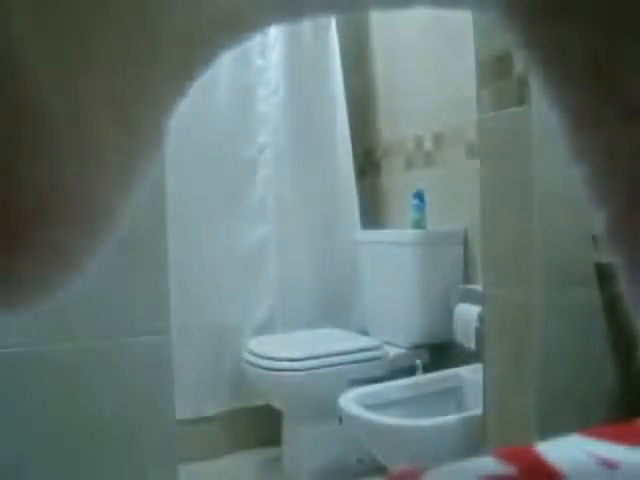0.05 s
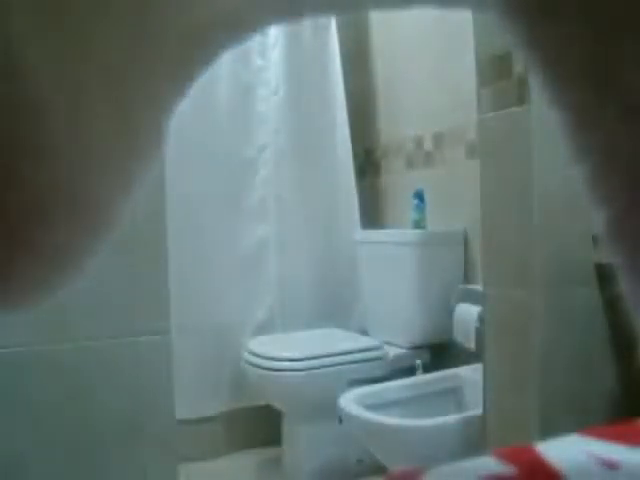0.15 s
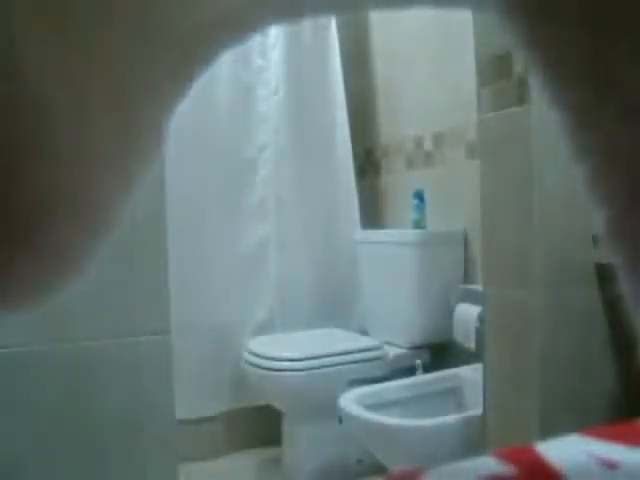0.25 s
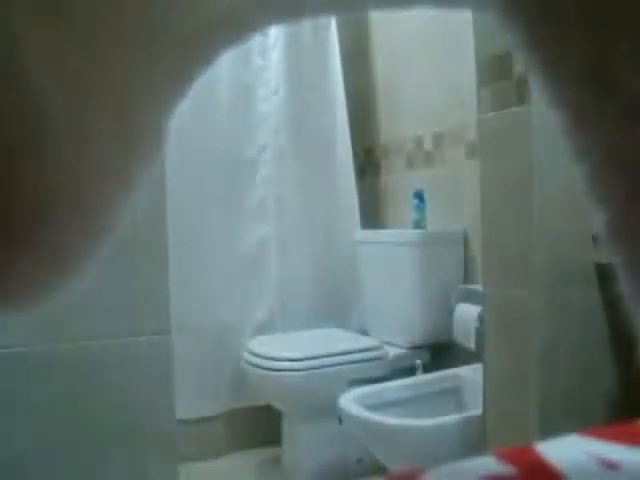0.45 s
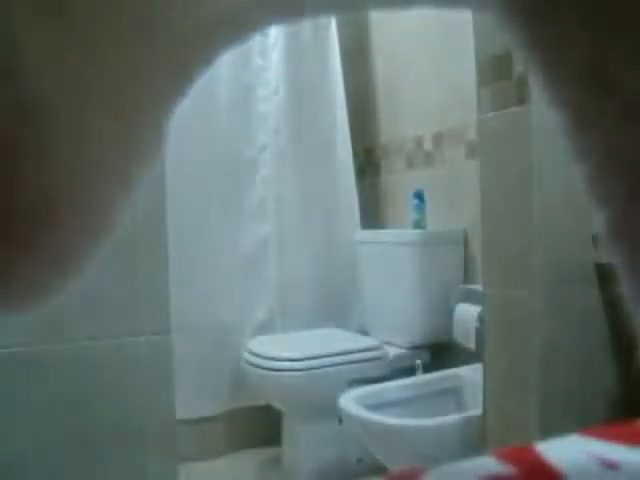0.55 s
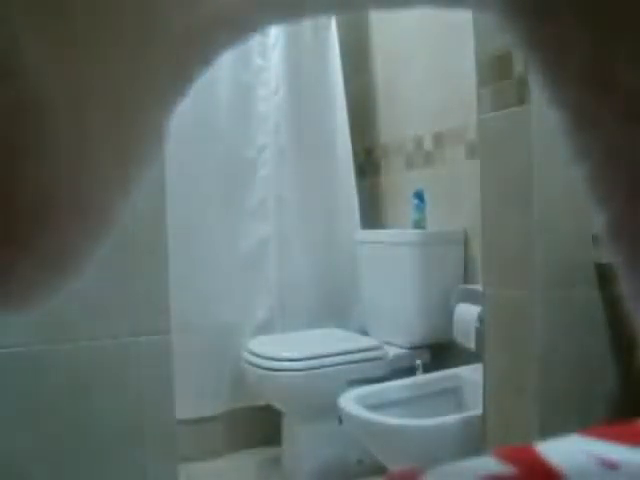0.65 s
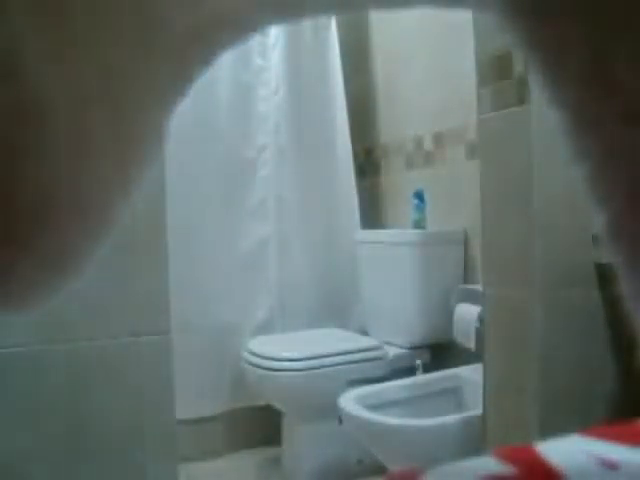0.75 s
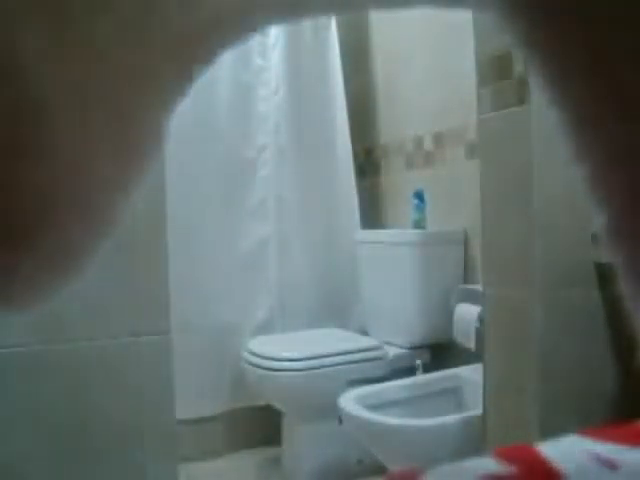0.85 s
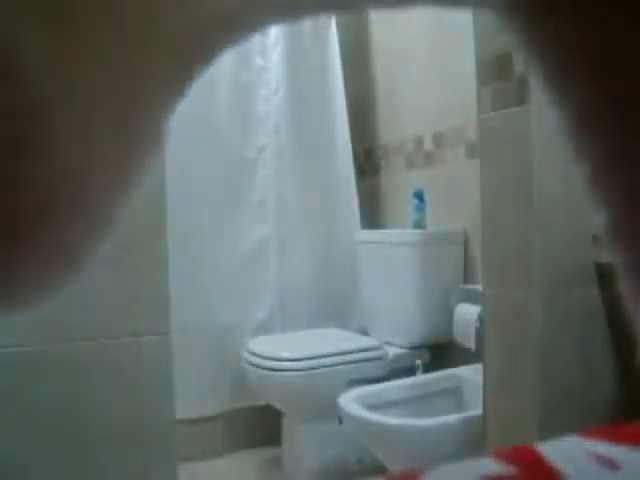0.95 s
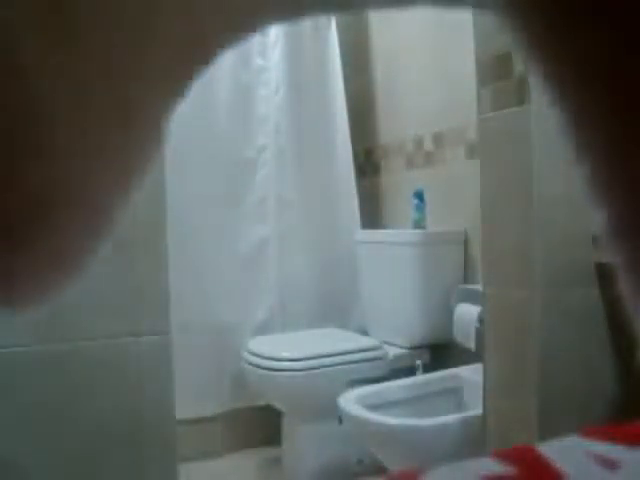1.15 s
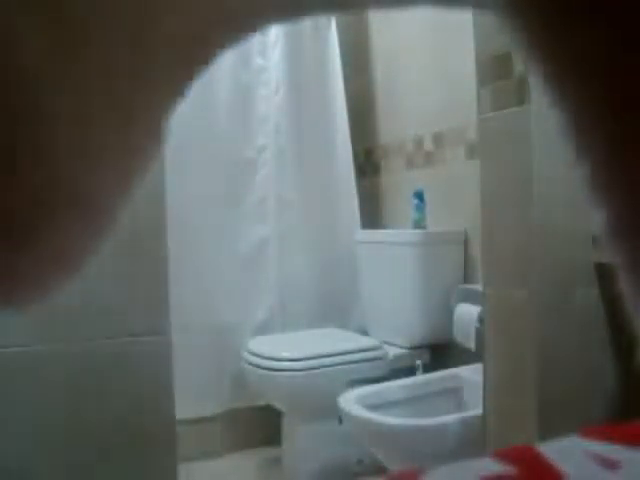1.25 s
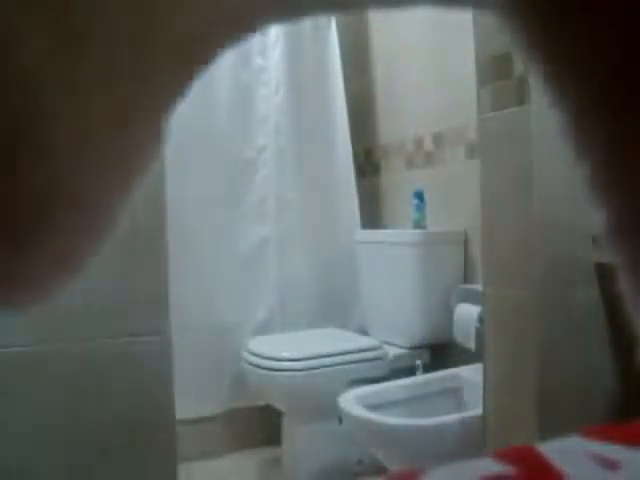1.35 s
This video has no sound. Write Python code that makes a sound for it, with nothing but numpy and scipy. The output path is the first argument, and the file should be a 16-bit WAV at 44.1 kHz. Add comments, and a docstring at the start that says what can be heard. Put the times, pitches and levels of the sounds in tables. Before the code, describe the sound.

A door is pushed shut in a small bathroom, its latch snapping before a booming thud.

```python
"""A door is pushed shut in a small tiled bathroom.
Its handle ticks twice, then the latch scrapes over its plate and snaps. The door pushes
air ahead of it, hits the frame and chatters while the room booms. Faint dull bumps follow
over a steady hiss. Each hit is a burst of fading noise; things that ring add fading tones."""
import sys
import numpy as np
from scipy import signal
from scipy.fft import rfft, irfft, next_fast_len
from scipy.io import wavfile
from scipy.ndimage import uniform_filter1d

SR = 44100
rng = np.random.default_rng(int(sys.argv[2]) if len(sys.argv) > 2 else 0)


def pcm_store(signal):
    """Save signal as 16-bit PCM."""
    levels = np.round(np.clip(np.atleast_2d(signal), -1, 1) * 32767)
    wavfile.write(sys.argv[1], SR, levels.astype(np.int16).T)


N = 61739
TIME = np.arange(N) / SR
BAND_EDGES_HZ = 28 * 2 ** (np.arange(44) / 5)
BAND_CENTRES_HZ = np.sqrt(BAND_EDGES_HZ[1:] * BAND_EDGES_HZ[:-1])

# When each hit happens: (time [s], level [dB], brightness [dB per octave])
RUBS = [(.001, 1.5, 0), (.158, -0.5, -3.5)]
HANDLE_TICKS = [(.039, 0, 0.6), (.127, -.5, 0.8)]
LATCH_SCRAPES = [(.204, 0, 1), (.212, 0.5, -1.8), (.232, -2.5, -0.61), (.256, 4, 0), (.281, 2, -1.4),
                 (.305, 3, -1.85)]
CRACKS = [(.2045, -9.5, 1.5), (.3475, 1, 2), (.3525, -3, 4), (.357, -2, -2)]
LATCH_SNAPS = [(.254, 0, 0.0063)]
SLAMS = [(.347, -2.5, 2.87), (.352, -2, -0.88), (.363, -4, -2), (.379, -7.5, -2.9), (.391, -4.5, -3.1),
         (.42, -13, 0.61), (.44, -21, -2), (.497, -24, -2)]
SOFT_KNOCKS = [(.669, 0.5, 0.12), (.716, -5.5, -0.1), (.885, -10, -1.26), (1.04, -10, 0),
               (1.134, -19, 0.13), (1.37, -16, -0.15)]
BUMPS = [(.781, -1, 1.2), (.821, 1.5, 0.62), (.85, -10.5, -1.7)]
SMALL_TICKS = [(.781, 4.5, -2.6), (.888, -7, 0.21), (.953, 4, -1), (1.02, -4, -0.57), (1.054, -1, 0.35),
               (1.087, -5, 1), (1.154, 2.5, 0.3), (1.221, -1.5, 1)]

# The colour of each noise, or how strong it is from low to high: (frequency [Hz], level [dB])
HISS_COLOUR = [(30, -65), (60, -51), (130, -49), (250, -33.5), (500, -38), (1000, -42.5), (2000, -44),
               (3500, -50), (5000, -50), (7500, -54.5), (10000, -59.5)]
RUB_COLOUR = [(100, -45), (190, -27), (300, -42), (600, -30), (900, -33.5), (1300, -34.5), (2000, -34),
              (3500, -42), (8000, -50.5)]
HANDLE_COLOUR = [(60, -43), (250, -31), (500, -43), (880, -23.5), (1200, -36), (1750, -27.5), (2050, -25),
                 (2500, -37.5), (3700, -27), (5600, -42.5), (7200, -38.5), (10000, -49.5)]
SCRAPE_COLOUR = [(50, -29), (110, -20), (240, -14.5), (450, -17), (750, -13), (1300, -20), (2700, -18),
                 (4800, -26.5), (7000, -26), (10000, -32.5)]
CRACK_COLOUR = [(500, -29), (1500, -14), (2700, -11), (3800, -5), (5000, -11), (7200, -9), (10000, -24)]
SNAP_COLOUR = [(200, -46), (420, -13), (620, -7.5), (900, -18), (2000, -52), (3600, -16.5), (4300, -11),
               (5000, -4), (5700, -13), (6400, -21), (10000, -22.5)]
SLAM_COLOUR = [(50, -45), (130, -18.5), (260, -16.5), (480, -7), (700, -10), (1050, -7), (1500, -3.5),
               (2100, -8), (3000, -6.5), (5000, -12), (7400, -13), (10000, -25)]
KNOCK_COLOUR = [(100, -40), (330, -34), (480, -16.5), (700, -20.5), (900, -41), (2000, -40), (5000, -65)]
BUMP_COLOUR = [(50, -43), (130, -37), (280, -24.5), (550, -24), (700, -27), (860, -26.5), (1080, -28),
               (1550, -26), (2300, -44), (3200, -68), (10000, -64)]
SMALL_TICK_COLOUR = [(300, -42), (800, -32), (1400, -33.5), (2150, -30), (2700, -43), (8000, -51)]

# The tones each thing rings with: (frequency [Hz], level [dB], time to fade by 60 dB [s])
THUMP_TONES = [(103.9, -35.5, 0.33), (267, -44, .45), (401, -44.5, .25), (463, -45, 0.36)]
HANDLE_TONES = [(2080, -50, .5), (2060, -45.5, 0.73), (2200, -54, .35)]
LATCH_TONES = [(4760, -10, 0.015), (5500, -14, 0.012), (4300, -34, 0.047), (4610, -21.5, 0.11)]
DOOR_TONES = [(388.5, -27, 0.46), (638, -18.5, 0.27), (652, -18, 0.19), (729, -28, 0.45), (800, -23, 0.17),
              (871, -21.5, 0.28), (1374, -25, 0.27), (1589, -21, 0.39), (1700, -29, 0.42),
              (2385, -25, 0.35), (2787, -24, 0.23), (2950, -24, 0.23), (3139, -24.5, 0.3)]
ROOM_TONES = [(75.4, -32, 1.23), (149.6, -31.5, 1.04), (224.7, -34.5, 1.42), (273.6, -16.5, 0.43),
              (440.4, -16, 0.53), (484.5, -16, 0.5), (532, -29.5, 0.83)]
BUMP_TONES = [(862, -39, 0.12), (921, -43, .14), (277, -42, 0.45)]

# The door answering the latch: (time [s], frequency [Hz], level [dB], time to fade by 60 dB [s])
DOOR_RINGS = [(.208, 245, -18.5, 0.19), (.254, 606, -10, 0.082)]
# How long the tiled room echoes: (frequency [Hz], time to fade by 60 dB [s])
ROOM_ECHO = [(70, 1.5), (160, 1.13), (280, 0.67), (500, 0.59), (1000, .48), (2000, .42), (4500, 0.34),
             (10000, 0.27)]
# The hiss swells a little, then eases: (time [s], level [dB])
HISS_LEVEL = [(0, 1.5), (.65, 3.5), (.82, 1.5), (.89, 2.5), (1.05, .5), (1.4, 0)]


def from_db(db):
    """Turn decibels into a number to multiply by."""
    return 10 ** (np.asarray(db) / 20)


def at_hz(table, hz):
    """Read between a table's rows, giving every octave equal room."""
    frequencies, values = np.transpose(table)
    return np.interp(np.log(hz), np.log(frequencies), values)


def noise_bands():
    """Split white noise into bands a fifth of an octave wide."""
    size = next_fast_len(N)
    spectrum = rfft(rng.standard_normal(size))
    hz = np.arange(size // 2 + 1) * SR / size
    return [irfft(spectrum * ((hz >= low) & (hz < high)), size)[:N]
            for low, high in zip(BAND_EDGES_HZ, BAND_EDGES_HZ[1:])]


def steadied(noise, window_s=0.066):
    """Even out the slow swells of a noise, keeping its level."""
    power = uniform_filter1d(noise ** 2, int(window_s * SR))
    return noise * np.sqrt(np.mean(noise ** 2) / (np.abs(power) + 1e-14))


def hits(rows, colour, echo_scale):
    """Each hit fills the room with dense echoes; the low ones build up later and last longer."""
    start_s, db, brightness = np.transpose(rows)[:, :, None]
    step = 8  # samples between loudness updates
    age = np.maximum(TIME[::step] - start_s, 0)
    sound = np.zeros(N)
    for hz, band in zip(BAND_CENTRES_HZ, noise_bands()):
        octaves = np.clip(np.log2(hz / 1490), -2, 2)  # brightness tips the colour around 1490 Hz
        gain = from_db(at_hz(colour, hz) + db + brightness * octaves)
        fade = np.exp(-np.log(1000) * age / (echo_scale * at_hz(ROOM_ECHO, hz)))
        rise_s = 0.00055 + 2.1 / hz
        rise = 1 - np.exp(-age / rise_s)
        loudness = np.sqrt(np.sum((gain * fade) ** 2 * rise, axis=0))  # hits add up in power
        sound += np.repeat(loudness, step)[:N] * steadied(band)
    return sound


def ringing(tones, start_s, rise_s):
    """A struck thing rings with pure tones that build up and then fade."""
    age = np.maximum(TIME - start_s, 0)
    sound = np.zeros(N)
    for hz, db, fade_s in tones:
        fade = np.exp(-np.log(1000) * age / fade_s)
        sound += from_db(db) * fade * np.sin(2 * np.pi * (hz * age + rng.random()))
    return sound * (1 - np.exp(-age / rise_s))


def background(hum_hz=104.8, hum_db=-61):
    """A nearly steady hiss and a faint, wavering hum."""
    bands = zip(BAND_CENTRES_HZ, noise_bands())
    hiss = sum(from_db(at_hz(HISS_COLOUR, hz)) * band for hz, band in bands)
    hiss *= from_db(np.interp(TIME, *np.transpose(HISS_LEVEL)))
    waver = np.interp(TIME, np.linspace(0, TIME[-1], 14), rng.standard_normal(14))
    hum = from_db(hum_db) * (1 + 0.4 * waver) * np.sin(2 * np.pi * hum_hz * TIME)
    return hiss + hum


def thump_and_rubs():
    """A low thump at the start, and a brief rub before and after the handle's ticks."""
    thump = ringing(THUMP_TONES, start_s=0, rise_s=0.00067)
    return thump + hits(RUBS, RUB_COLOUR, echo_scale=0.61)


def handle():
    """The handle ticks twice and rings thinly after each tick."""
    ticks = hits(HANDLE_TICKS, HANDLE_COLOUR, echo_scale=0.81)
    rings = sum(from_db(db) * ringing(HANDLE_TONES, start_s, rise_s=0.017)
                for start_s, db, _ in HANDLE_TICKS)
    return ticks + rings


def latch():
    """The bolt scrapes over its plate and snaps brightly, and the door rings along."""
    scrape = hits(LATCH_SCRAPES, SCRAPE_COLOUR, echo_scale=0.67)
    snap = hits(LATCH_SNAPS, SNAP_COLOUR, echo_scale=0.64)
    latch_ring = ringing(LATCH_TONES, start_s=0.2541, rise_s=0.0001)
    door_ring = sum(ringing([tone], start_s, rise_s=0.013) for start_s, *tone in DOOR_RINGS)
    return scrape + snap + latch_ring + door_ring


def cracks():
    """The hardest touches of latch and door give a dry crack ahead of the room's echo."""
    return hits(CRACKS, CRACK_COLOUR, echo_scale=0.048)


def air_push(start_s=0.205, hz=70, peak_db=-21.5):
    """Air pushed ahead of the door makes a deep tone that swells until the door closes."""
    swell = np.interp(TIME, [start_s, 0.35, 0.3501, 0.36], [0, 1, 0.55, 0])
    return from_db(peak_db) * swell * np.sin(2 * np.pi * hz * (TIME - start_s))


def slam(boom_s=0.349):
    """The door hits the frame and chatters; it rings at once, while the room's boom builds slowly."""
    chatter = hits(SLAMS, SLAM_COLOUR, echo_scale=0.84)
    door_ring = ringing(DOOR_TONES, boom_s, rise_s=0.0074)
    room_boom = ringing(ROOM_TONES, boom_s, rise_s=0.039)
    return chatter + door_ring + room_boom


def knocks_and_bumps():
    """Soft knocks, dull bumps and small ticks follow; the strongest bump rings with a hollow note."""
    knocks = hits(SOFT_KNOCKS, KNOCK_COLOUR, echo_scale=0.4)
    bumps = hits(BUMPS, BUMP_COLOUR, echo_scale=0.47)
    ticks = hits(SMALL_TICKS, SMALL_TICK_COLOUR, echo_scale=0.1)
    hollow_note = ringing(BUMP_TONES, start_s=0.82, rise_s=0.0026)
    return knocks + bumps + ticks + hollow_note


def scene():
    """Add all the sounds into one channel."""
    mix = background() + thump_and_rubs() + handle() + latch()
    mix += cracks() + air_push() + slam() + knocks_and_bumps()
    return mix[None]


def record(dry, cutoff_hz=10100):
    """Round off the loudest peaks and steeply cut the highest treble."""
    rounded = 0.87 * np.tanh(dry / 0.83)
    treble_cut = signal.ellip(12, 0.2, 65, cutoff_hz, fs=SR, output="sos")
    return signal.sosfilt(treble_cut, rounded)


dry = scene()
out = record(dry)
pcm_store(out)
```